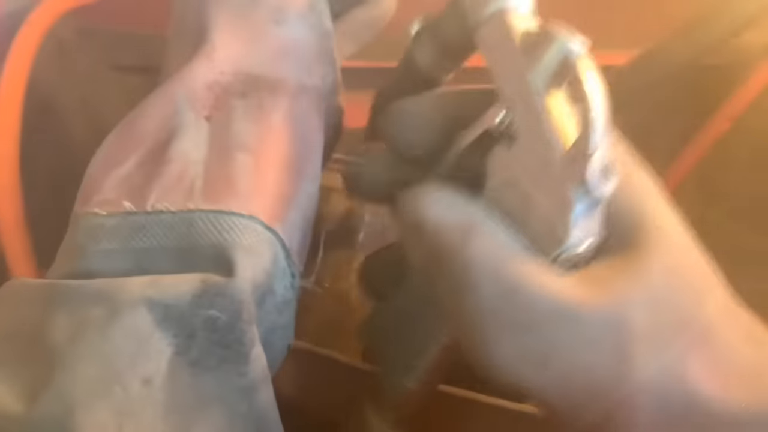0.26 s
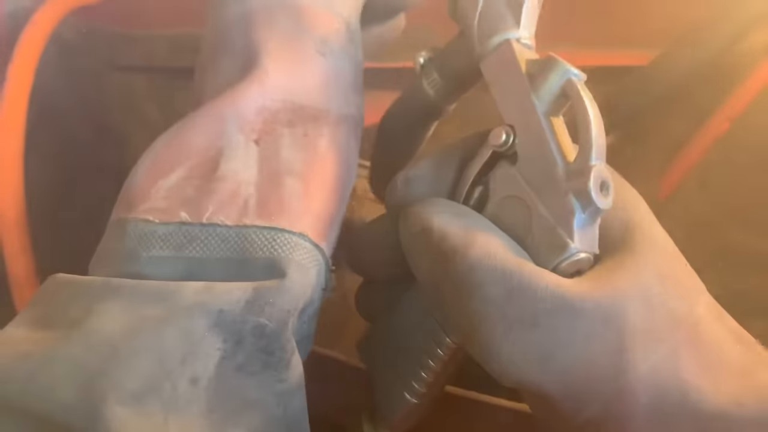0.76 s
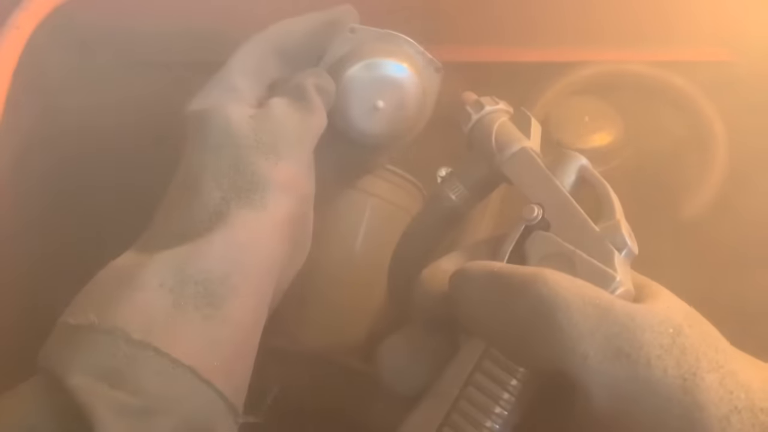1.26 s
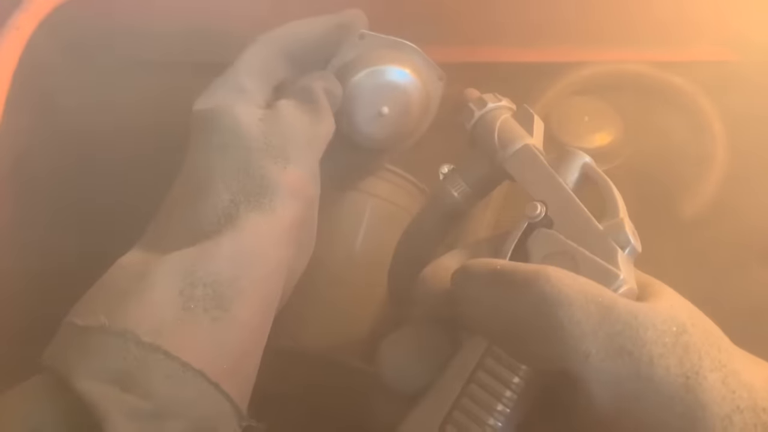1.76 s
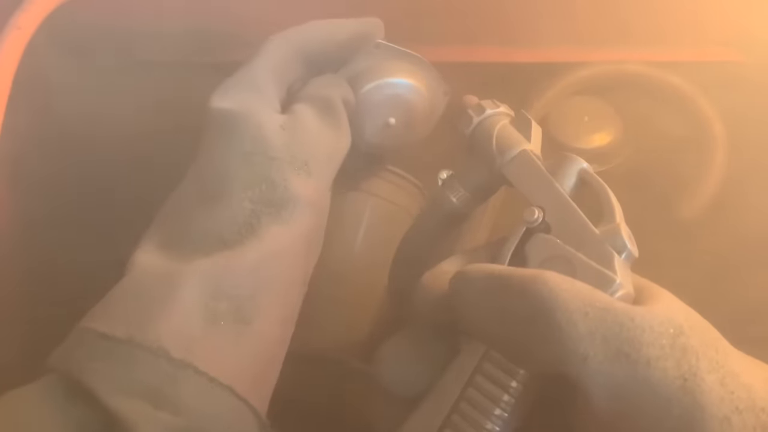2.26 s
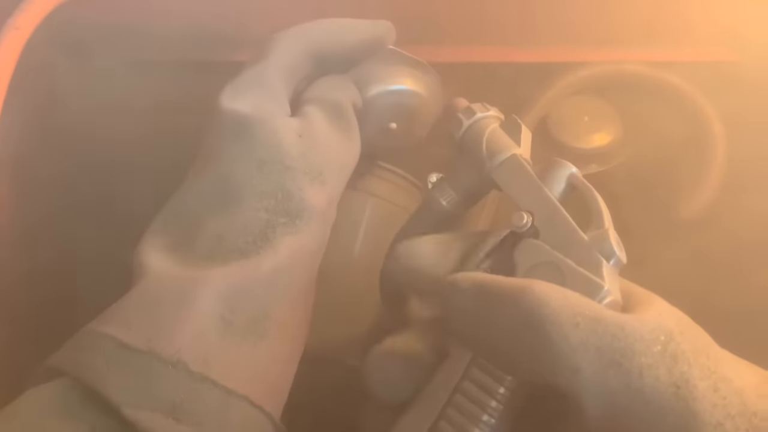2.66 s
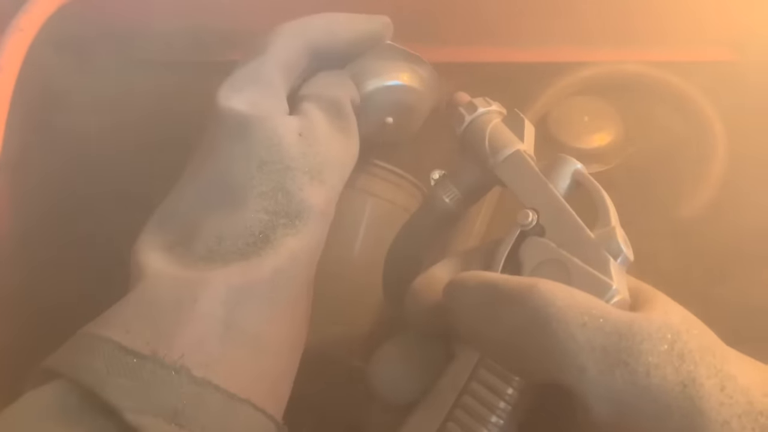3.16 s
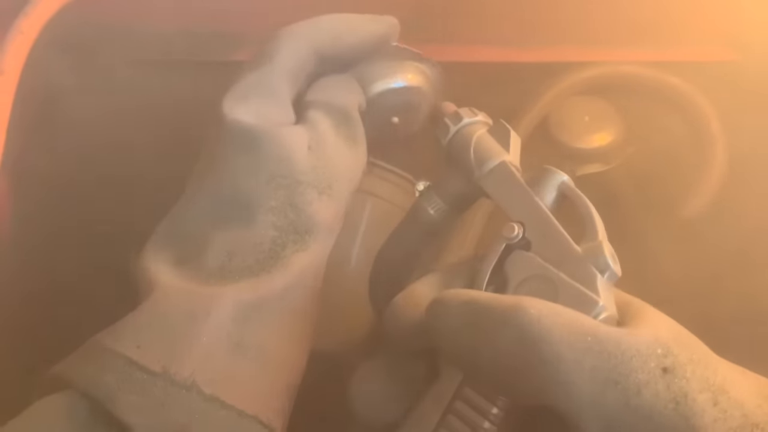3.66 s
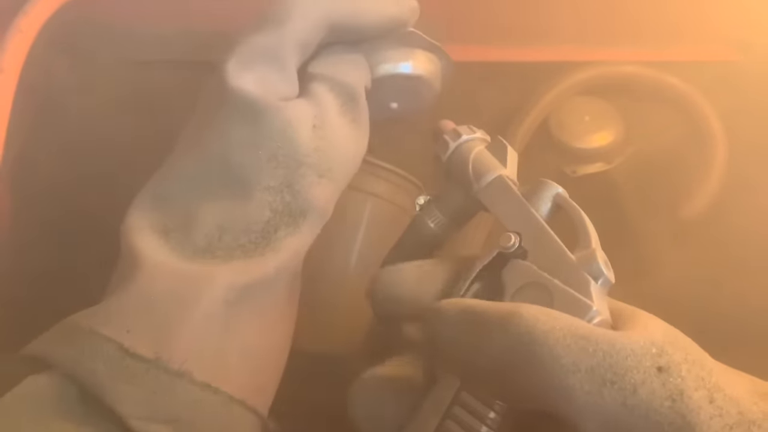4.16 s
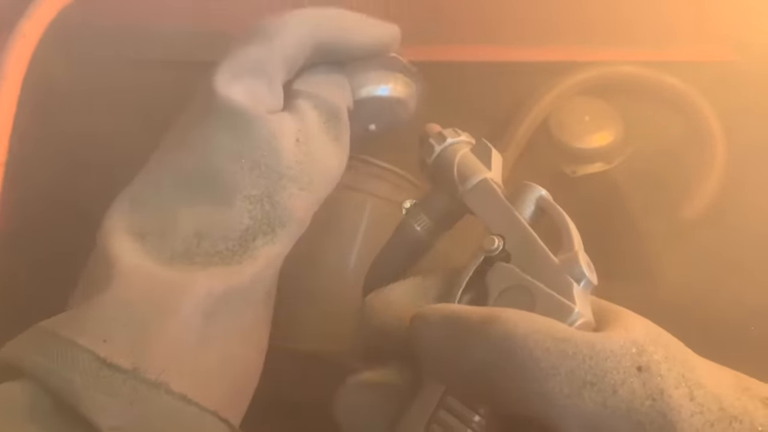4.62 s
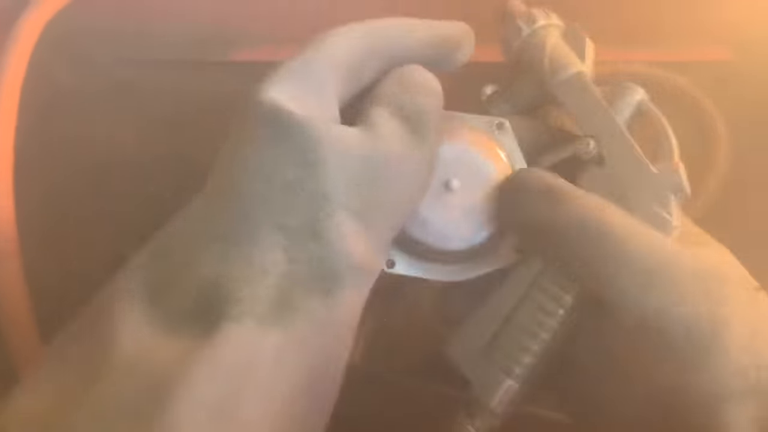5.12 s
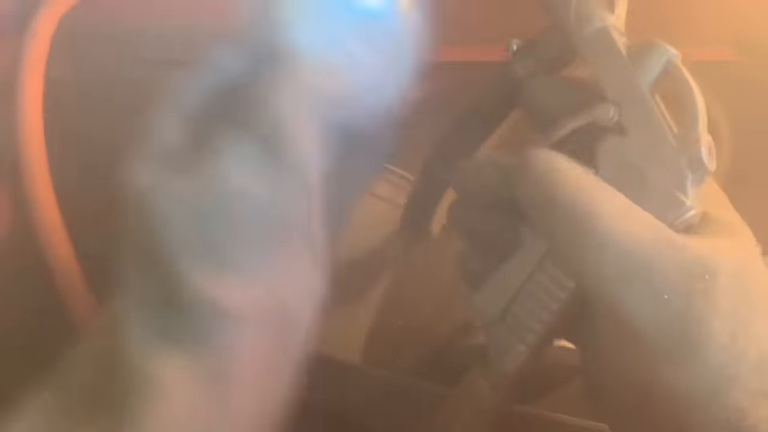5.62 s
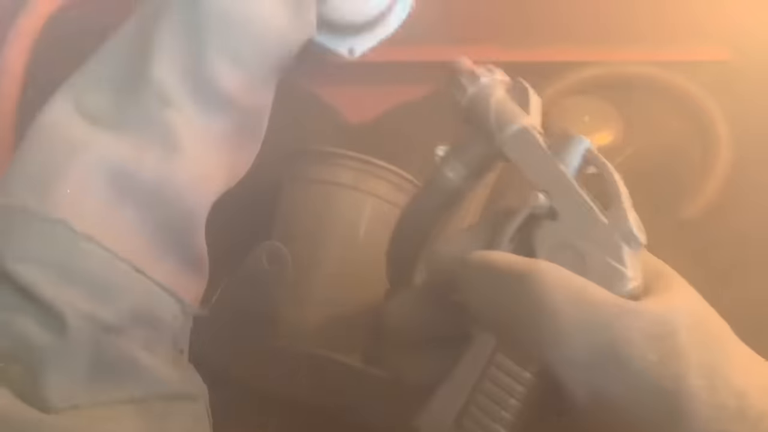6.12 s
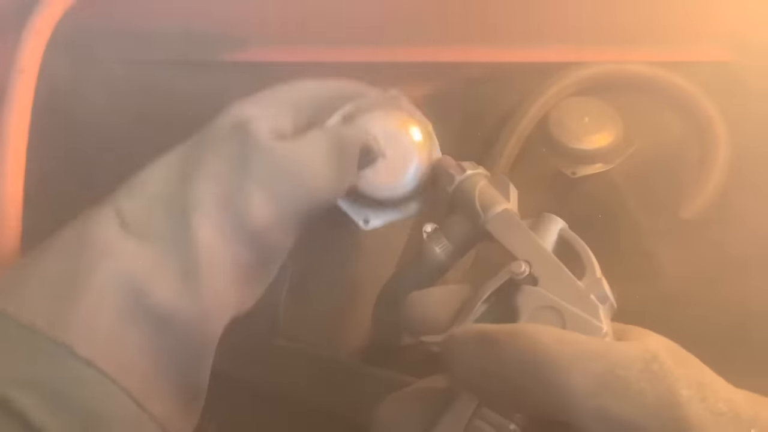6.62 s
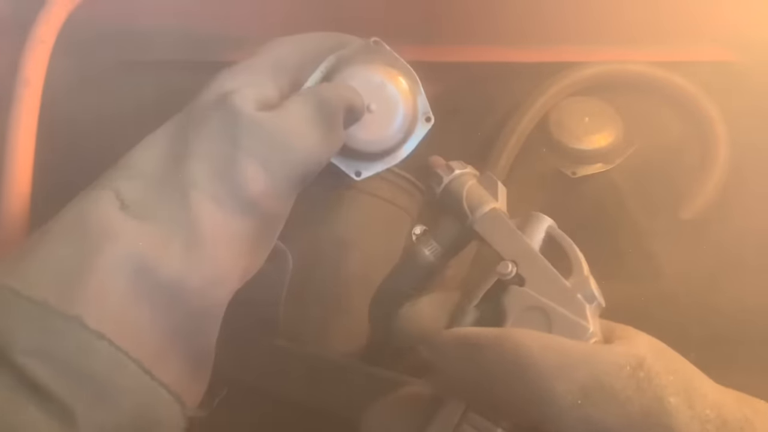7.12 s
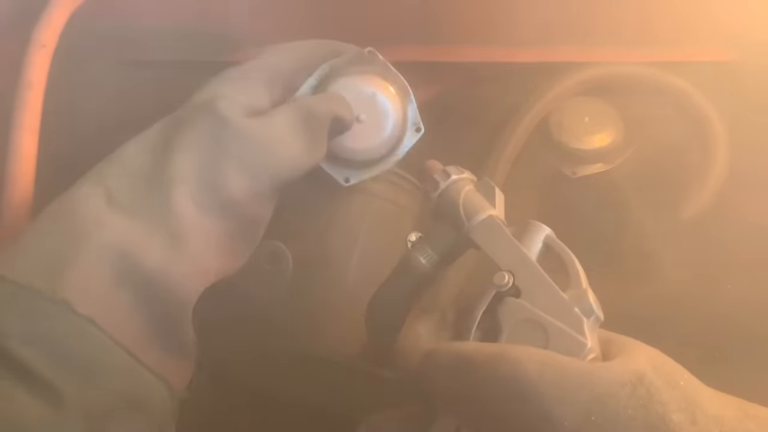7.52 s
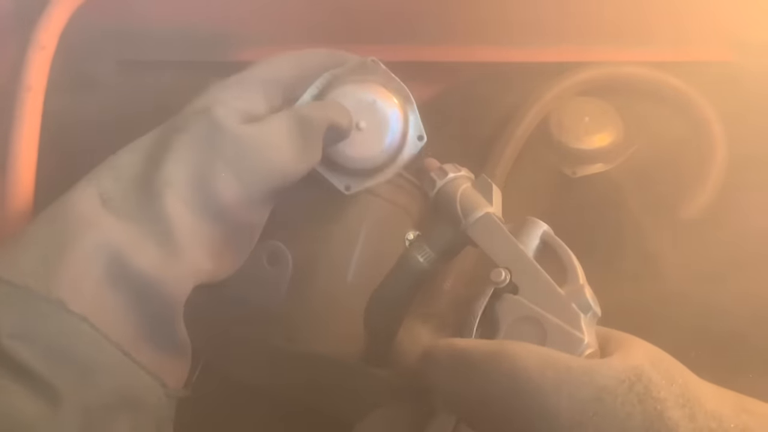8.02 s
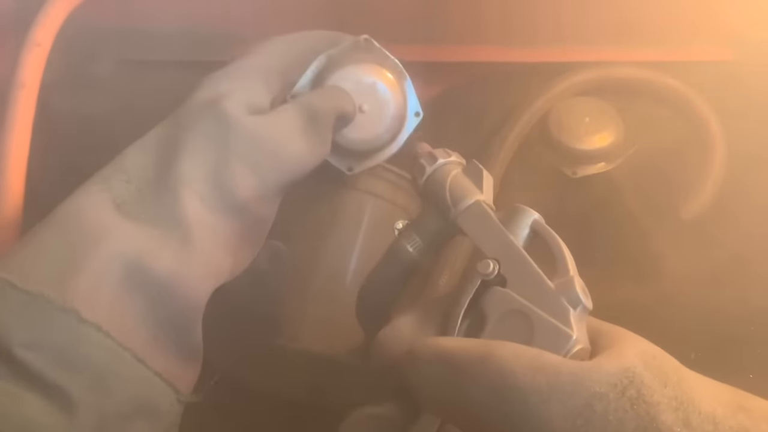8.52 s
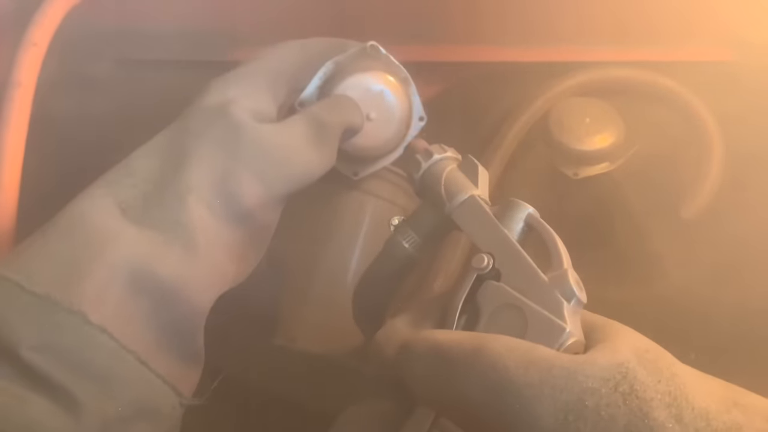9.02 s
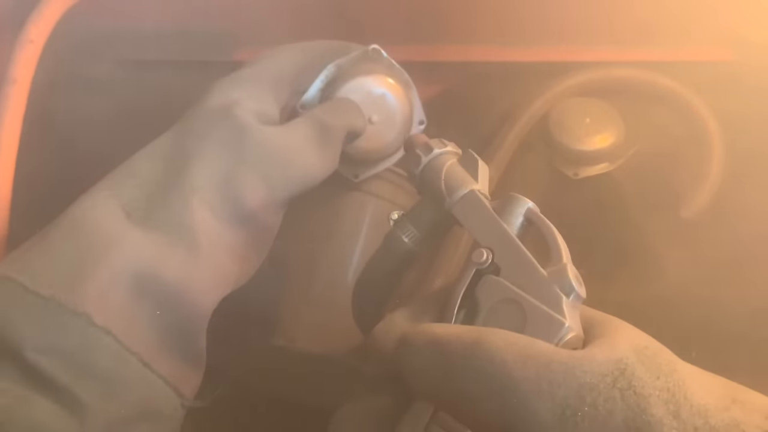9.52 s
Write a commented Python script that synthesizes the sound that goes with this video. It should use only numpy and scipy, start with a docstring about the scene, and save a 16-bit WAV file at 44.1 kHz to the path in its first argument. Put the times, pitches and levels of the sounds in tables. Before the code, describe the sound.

A faint workshop noise bed and a soft, dull knock at 0.1 seconds lead into a loud burst of compressed air at about 0.15-0.4, roaring hollowly in a steel cabinet with bright gritty hiss. It shuts abruptly, leaving a faint whistling hose bleed. A longer blast from about 0.6 to 1.07 opens with a harsh rasp, sags slightly in pressure, then bleeds away likewise. From 1.0 to 1.3 a much quieter steady spray fades in, with another soft knock at 1.1. Air rush, fine abrasive sizzle and a buzzing, beating extractor whine around one kilohertz continue to the end, near 9.75. Spray dips briefly around 2.8, 7.2 and 8.6, and thins near 5.8 and 6.5. A hollow howl swells around 4.3; low motor drone rises near 5.3. Close mono microphone, tight metallic reflections, rolled-off top treble.

```python
"""A blast gun works on small metal parts inside a steel sandblasting cabinet, over a workshop background.
A soft knock, then two loud trigger pulls: turbulent air roars in the box while nozzle and grit hiss,
and the hose bleeds out with a faint whistle after each. From about one second on, with another knock as it
fades in, a quieter steady hiss: filtered noise for air, noise and sparse impacts for grit,
over the extractor motor's whine of partials on multiples of its shaft rate; the cabinet howls once."""
import sys
import numpy as np
from scipy import signal
from scipy.fft import rfft, irfft, next_fast_len
from scipy.io import wavfile
from scipy.ndimage import uniform_filter1d

SR = 44100
rng = np.random.default_rng(int(sys.argv[2]) if len(sys.argv) > 2 else 0)


def materialize(psi):
    """Save the field psi as 16-bit PCM at rate SR to the path in sys.argv[1].

    A 1-D psi becomes a single channel; in a 2-D psi each row is a channel.
    """
    bounded = np.clip(np.atleast_2d(psi).T, -1, 1)
    quanta = np.round(bounded * 32767).astype(np.int16)
    wavfile.write(sys.argv[1], SR, quanta)


N = 431298
T = np.arange(N) / SR
SHAFT_HZ = 57.447


def undb(db):
    """Decibels to gain."""
    return np.exp(np.maximum(db, -400) * (np.log(10) / 20))


def unit(x):
    """Scale to rms 1."""
    return x / np.sqrt(np.mean(x ** 2))


def curves(rows):
    """Each column of a table joined by straight lines in time."""
    s, *columns = np.transpose(rows)
    return [np.interp(T, s, c) for c in columns]


def hump(s, half_s):
    """Gaussian rise to 1 at time s and back, down to 1/e at half_s to either side."""
    return np.exp(-((T - s) / half_s) ** 2)


def walk(rate_hz):
    """Smooth chance with about rate_hz turns a second; rms 1."""
    knots = rng.standard_normal(N // 40)
    wander = np.interp(T * rate_hz, np.arange(len(knots)), knots)
    return unit(uniform_filter1d(wander, max(int(SR / rate_hz / 2), 1)))


def colour(x, points):
    """Filter x by gain points (Hz, dB), joined over log frequency; rms 1."""
    hz, db = np.transpose(points)
    size = next_fast_len(N)
    f_hz = np.maximum(np.arange(size // 2 + 1) * SR / size, 1)
    gain = undb(np.interp(np.log(f_hz), np.log(hz), db))
    return unit(irfft(rfft(x, size) * gain, size)[:N])


def ring(x, hz, width_hz):
    """One resonance, gain 1 at its centre."""
    return signal.lfilter(*signal.iirpeak(hz, hz / width_hz, fs=SR), x)


def band(hz, width_hz):
    """Noise passed twice through one resonance; rms 1."""
    once = ring(rng.standard_normal(N), hz, width_hz)
    return unit(ring(once, hz, width_hz))


def turbulence(flutter_db, rate_hz):
    """Noise whose strength flutters as eddies pass."""
    return rng.standard_normal(N) * undb(flutter_db * walk(rate_hz))


def grains(rate_hz, spread_db):
    """Impacts of abrasive at random times: many small ones and a few large; rms 1."""
    struck = rng.random(N) < rate_hz / SR
    size = undb(spread_db * np.minimum(rng.exponential(size=N), 5))
    return unit(struck * size * rng.choice([-1, 1], N))


def reflected(x, t60_s, echo_db):
    """Dense echoes from the close steel walls give a sound many narrow peaks and dips; rms 1."""
    t = T[:int(SR * t60_s)]
    echoes = rng.standard_normal(len(t)) * undb(-60 * t / t60_s)
    echoes *= undb(echo_db) / np.linalg.norm(echoes)
    return unit(x + signal.oaconvolve(x, echoes)[:N])


def trigger_pulls():
    """Turbulent air roars in the box while nozzle and grit hiss; after each pull the hose bleeds and whistles."""
    # Each row: fully open in s, released in s, roar in dB, hiss in dB, opening rasp in dB re hiss,
    # ring of the space aimed into in dB re direct jet, bleeding hiss in dB re hiss.
    pulls = [(0.183, 0.385, -14.5, -15.5, -24, 3, -10), (0.614, 1.068, -14.5, -14, -7.5, -3.5, -15)]
    # Spectra of the open jet. Each row: frequency in Hz, relative level in dB.
    roar_spectrum = [(25, -31), (130, -34), (250, -22), (400, -13.5), (520, -17), (630, -23.5), (800, -6.5),
                     (1150, -5.5), (2300, -2.5), (2700, -8.5), (4000, -19.5), (7000, -40)]
    nozzle_spectrum = [(1500, -25.5), (2600, -6.5), (3300, 1.5), (4300, 1.5), (5000, -2.5), (6000, -0.5),
                       (6900, -4), (7400, -20.5)]
    # Resonances of the space aimed into, a table a pull. Each row: centre in Hz, width in Hz, relative level in dB.
    first_aim = [(970, 22, -12), (1220, 63, -4.5), (1596, 82, -1.5), (1999, 35, -2.5), (2262, 73, -3)]
    second_aim = [(1226, 65, 5.5), (1477, 89, -3.5), (1740, 52, -22), (2276, 17, 6), (2790, 29, -1)]
    # held open, the pressure sags: the hiss at once, the roar after a while
    hold_s, roar_sag_db_per_s, hiss_sag_db_per_s = 0.24, 30, 18
    roar_bleed_db = -17
    # grit that lay in the hose spits out first; the rasp is strongest at the opening and soon fades
    spit_db, spit_half_s, rasp_half_s = 0.5, 0.022, 0.18

    jet = colour(turbulence(flutter_db=0.2, rate_hz=130), roar_spectrum)
    nozzle = turbulence(flutter_db=0, rate_hz=120) + undb(-6.5) * grains(rate_hz=2900, spread_db=1)
    hiss = colour(reflected(nozzle, t60_s=0.05, echo_db=-9.5), nozzle_spectrum)
    whistle = undb(-4.5) * band(hz=4350, width_hz=450)
    # a sheet-metal panel booms along with the jet
    panel = undb(-25) * band(hz=410.4, width_hz=37)
    rasp = band(hz=3700, width_hz=1000)
    out = 0
    for pull, modes in zip(pulls, [first_aim, second_aim]):
        open_s, release_s, roar_db, hiss_db, rasp_db, ring_db, bleed_db = pull
        roar_valve = valve(open_s, release_s, hold_s, roar_sag_db_per_s, roar_bleed_db, 1.75)
        hiss_valve = valve(open_s, release_s, 0, hiss_sag_db_per_s, bleed_db, 1)
        roar = (aimed(jet, modes, ring_db) + panel) * roar_valve
        bleeding = np.clip((T - release_s) / 0.035, 0, 1)
        spit = undb(spit_db * hump(open_s + spit_half_s / 2, spit_half_s))
        rasping = undb(rasp_db) * hump(open_s, rasp_half_s)
        nozzle_sound = (hiss * spit + bleeding * whistle + rasping * rasp) * hiss_valve
        # the roar gives way to the rasp
        out = out + undb(roar_db - 5 * rasping) * roar + undb(hiss_db) * nozzle_sound
    return out


def valve(open_s, release_s, hold_s, sag_db_per_s, bleed_db, pressure_power):
    """Gain of one pull: fast attack, hold, sagging pressure, then a quick shut and the slow bleed of the hose."""
    attack_s, shut_db_per_s, bleed_s = 0.032, 562, 0.21
    opening = np.clip(1 + (T - open_s) / attack_s, 0, 1) ** 3
    sagging_s = np.maximum(np.minimum(T, release_s) - open_s - hold_s, 0)
    after_s = np.maximum(T - release_s, 0)
    # the pressure left in the hose runs out evenly
    pressure = np.maximum(1 - after_s / bleed_s, 0)
    closing = np.maximum(undb(-shut_db_per_s * after_s), undb(bleed_db) * pressure ** pressure_power)
    return opening * undb(-sag_db_per_s * sagging_s) * closing


def aimed(jet, modes, ring_db):
    """The jet heard directly and through the resonances that it excites; rms 1."""
    rung = sum(undb(db) * ring(jet, hz, width_hz) for hz, width_hz, db in modes)
    return unit(jet + undb(ring_db) * unit(rung))


def steady_blasting():
    """Air rushes through the cabinet, pulsing with each turn of the fan, while grit sprays on the part."""
    # How squarely the jet meets the part as it is turned. Each row: time in s, spray in dB re grit_db.
    contact = [(1.15, -5.5), (1.27, 3), (1.36, 0), (2.3, -0.5), (2.63, 0.5), (3.0, 1), (3.55, -2),
               (3.87, 0), (4.45, -2), (4.72, -1), (5.0, -3.5), (5.8, -5.5), (6.3, -2), (6.5, -6), (7.45, 1),
               (7.7, -1.5), (8.35, 0.5), (9.2, -2.5)]
    # Brief changes of the spray: mostly short dips, one slight rise.
    # Each row: time in s, half length in s, spray change in dB.
    brief_changes = [(2.8, 0.064, -7), (6.542, .06, 1), (7.2, .06, -5.5), (7.97, 0.028, -3),
                     (8.567, 0.055, -5.5)]
    # Base levels as the part is turned. Each row: time in s, body of the air in dB, splash off the part in dB.
    jet = [(1.2, -40, -44.5), (3.0, -39, -46), (3.4, -40, -45), (3.9, -41, -42.5), (5.0, -42, -44),
           (5.9, -41.5, -44.5), (7.4, -41, -44.5), (8.4, -40, -44), (9.75, -40.6, -44)]
    # The cabinet howls once while the part is lifted: time in s, half length in s, rise of the rush in dB.
    swell_s, swell_half_s, rise_db = (4.26, 0.61, 0.65)
    # The resonance that howls: centre in Hz, width in Hz, level in dB at the top of the swell, before the throb.
    howl_hz, howl_width_hz, howl_db = (1135, 120, -36.5)
    # Spectra of the layers. Each row: frequency in Hz, relative level in dB.
    rush_spectrum = [(740, -40), (820, -8.5), (990, -12), (1070, 0), (1110, 4), (1165, -14), (1280, -5.5),
                     (1400, -15), (2200, -43)]
    air_spectrum = [(740, -34.5), (900, -5.5), (1450, -4), (1650, -1.5), (1900, -4), (2100, -1.5),
                    (2300, 1), (2850, -2), (3050, -8.5), (4000, -14.5), (7000, -33.5)]
    splash_spectrum = [(1800, -25), (2700, -4), (3300, 0.5), (4100, -0.5), (4700, -12), (6500, -26)]
    grit_spectrum = [(2500, -23.5), (3800, -8), (4600, 1), (5800, 0.5), (6450, 2.5), (6800, 0.5),
                     (7020, -5), (7300, -25), (7500, -36.5)]
    rumble_spectrum = [(25, 3), (100, 0.5), (300, -3.5), (650, 4.5), (1000, -11)]
    rush_db, grit_db = -44.5, -44.5
    # dB of air and splash per dB of spray
    air_follows, splash_follows = 0.15, 0.15
    fade_from_s, fade_full_s = 0.97, 1.276

    spray_db = curves(contact)[0] + sum(db * hump(s, half_s) for s, half_s, db in brief_changes)
    swell = hump(swell_s, swell_half_s)
    swell_db = rise_db * swell
    air_db, splash_db = curves(jet) + np.outer([air_follows, splash_follows], spray_db)
    turns = SHAFT_HZ * T + 0.003 * walk(1.5)
    throb = np.cos(2 * np.pi * turns)

    rush = turbulence(flutter_db=3.5, rate_hz=41) * undb(0.51 * throb)
    rush = colour(rush, rush_spectrum) * undb(rush_db + swell_db)

    air = reflected(turbulence(flutter_db=1.5, rate_hz=73), t60_s=0.11, echo_db=-11)
    air = colour(air * undb(1.3 * throb), air_spectrum) * undb(air_db)

    splash = turbulence(flutter_db=1, rate_hz=30) * undb(1.3 * throb)
    splash = colour(splash, splash_spectrum) * undb(splash_db)

    spray = turbulence(flutter_db=1.2, rate_hz=25) + undb(-2) * grains(rate_hz=2500, spread_db=3)
    grit = reflected(spray, t60_s=0.06, echo_db=-11.5) * undb(0.82 * throb)
    grit = colour(grit, grit_spectrum) * undb(grit_db + spray_db)

    # low rumble of the moving air
    rumble = colour(rng.standard_normal(N), rumble_spectrum) * undb(-69 + 0.6 * swell_db)
    howl = band(howl_hz, howl_width_hz) * undb(howl_db + 2.2 * throb) * swell
    motor = extractor(turns, swell_db) + undb(-0.6) * low_drone(turns)
    fade = np.interp(T, [fade_from_s, fade_full_s], [0, 1])
    return fade * (rush + howl + air + splash + grit + rumble + motor)


def extractor(turns, swell_db):
    """The motor drones on multiples of its shaft rate; a weak sideband beside each partial makes it beat."""
    # Strong partials, each set on the nearest shaft multiple. Each row: frequency in Hz, level in dB rms.
    whine = [(804, -63.5), (861, -49.5), (920, -53.5), (976, -54), (1034, -42.5), (1092, -40),
             (1149, -43.5), (1206, -45.5), (1264, -46), (1321, -57), (1378, -53.5), (1608, -47),
             (1723, -53.5), (2240, -50), (2298, -54.5), (2470, -52), (2643, -52.5), (2700, -52.5),
             (2757, -56), (2872, -52), (2987, -56), (3332, -57), (4079, -56.5), (4710, -63), (6204, -62),
             (6319, -65.5)]
    # Weaker multiples in between and above, before random spread. Each row: frequency in Hz, level in dB rms.
    buzz = [(800, -66.5), (1500, -65), (2400, -61), (3200, -64.5), (4100, -63.5), (5000, -75.5),
            (5800, -84), (6250, -70), (6900, -77)]
    # Housing tones not locked to the shaft, before waver and swell. Each row: frequency in Hz, level in dB rms.
    housing_tones = [(1068, -57), (1082, -55), (1101, -50.5), (1107, -49.5), (1119, -56.5), (1125, -51)]
    orders = np.arange(14, 121)
    db = np.interp(orders * SHAFT_HZ, *np.transpose(buzz)) + 2 * rng.standard_normal(len(orders))
    for hz, line_db in whine:
        db[np.argmin(abs(orders * SHAFT_HZ - hz))] = line_db
    drone = 0
    # interleaved groups of partials beat and waver apart
    for k, beat_hz in enumerate([3.7, 4.4, 3.3]):
        beat = 1 + undb(-13) * np.exp(2j * np.pi * beat_hz * T)
        group = shaft_tones(turns, orders[k::3], db[k::3])
        drone = drone + np.real(group * beat) * undb(0.48 * walk(2.4))
    housing = 0
    for hz, line_db in housing_tones:
        tone = np.sqrt(2) * np.sin(2 * np.pi * hz * T + walk(2))
        housing = housing + undb(line_db + 2 * walk(5.7)) * tone
    # the housing sings up when the rush of air swells
    return drone + housing * undb(3.3 * swell_db)


def low_drone(turns):
    """The lowest notes of the motor and the band of air noise around them."""
    # Common level of notes and air, before the motor mix. Each row: time in s, level in dB.
    level = [(1.2, -55.5), (1.58, -53), (1.65, -57.5), (2.15, -54), (3.46, -55), (3.6, -60), (4.56, -56),
             (5.27, -47.5), (6.22, -56.5), (6.84, -50), (7.53, -66.5), (8.65, -53.5), (9.75, -52.5)]
    # Each row: multiple of the shaft rate, relative level in dB.
    low_notes = [(12, -9.5), (13, -1.5)]
    level_db, = curves(level)
    orders, db = np.transpose(low_notes)
    notes = np.real(shaft_tones(turns, np.rint(orders).astype(int), db))
    air_spectrum = [(600, -69), (660, -19), (695, 1), (790, -2), (900, -21), (1200, -69.5)]
    air = colour(rng.standard_normal(N), air_spectrum)
    return (notes + undb(-6) * air) * undb(level_db)


def shaft_tones(turns, orders, db):
    """Complex partials locked to a shaft; their loosely agreeing phases bunch the sound as it turns."""
    size = 8192  # table steps a turn
    phase_rad = 1.7 * rng.standard_normal(len(orders))
    partials = np.zeros(size, complex)
    partials[orders] = undb(db) * np.exp(1j * phase_rad) * size * np.sqrt(2)
    return np.fft.ifft(partials)[np.rint(turns * size).astype(int) % size]


def bump(s, db, hz, width_hz, half_s):
    """A soft knock of the gloved arms against the cabinet: a short hump of resonant noise."""
    return undb(db) * band(hz, width_hz) * hump(s, half_s)


def workshop():
    """Steady coloured noise of the workshop background."""
    # Each row: frequency in Hz, relative level in dB.
    shop_spectrum = [(25, -15.5), (100, -7.5), (200, -2.5), (380, -3), (700, -2.5), (1500, -8),
                     (4000, -7.5), (7000, -18.5)]
    return colour(rng.standard_normal(N), shop_spectrum) * undb(-67.5)


def scene():
    """The pulls, the steady work, two soft knocks and the workshop."""
    knocks = bump(s=0.102, db=-58.5, hz=288, width_hz=170, half_s=0.012)
    knocks = knocks + bump(s=1.1, db=-61, hz=380, width_hz=160, half_s=0.022)
    return (trigger_pulls() + steady_blasting() + knocks + workshop())[None]


def record(dry):
    """The highest peaks are softly rounded, and the microphone passes nothing above the middle treble."""
    rounded = dry / (1 + (dry / 0.85) ** 6) ** (1 / 6)
    lowpass = signal.cheby1(12, 0.2, 7100, fs=SR, output="sos")  # order, ripple in dB, edge in Hz
    return signal.sosfilt(lowpass, rounded)


dry = scene()
out = record(dry)
materialize(out)
```